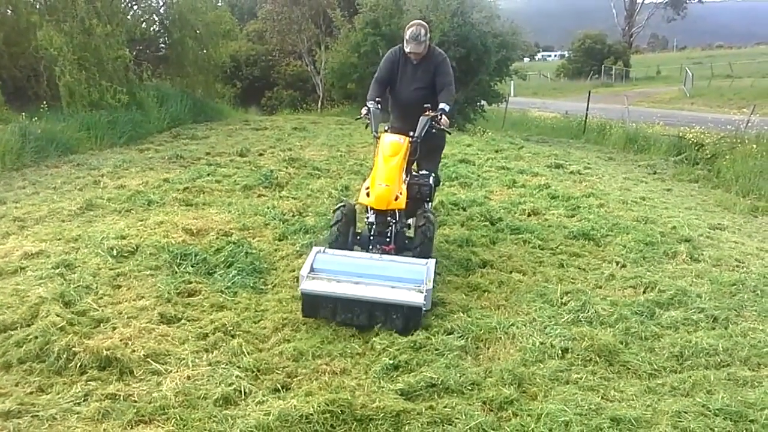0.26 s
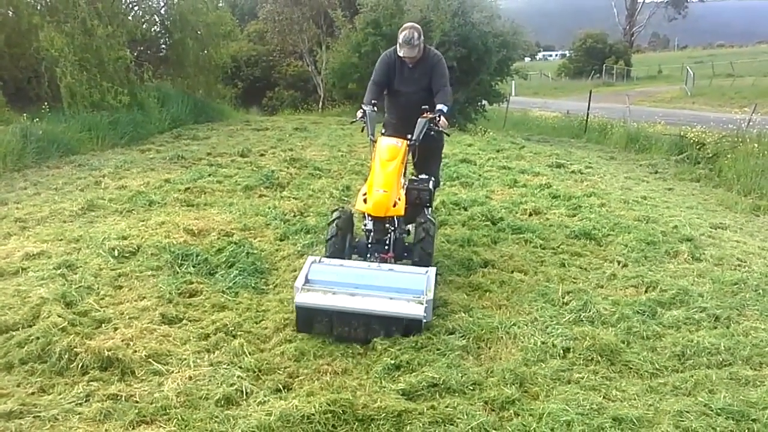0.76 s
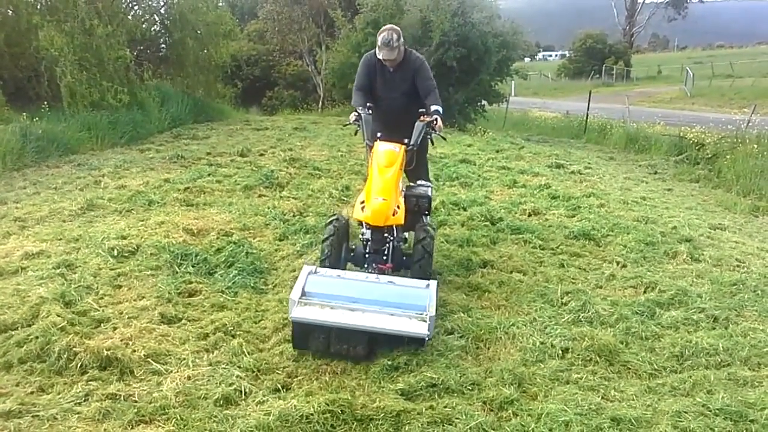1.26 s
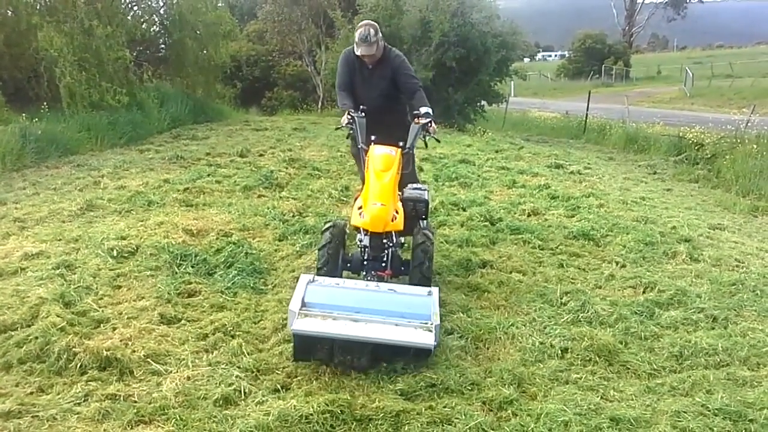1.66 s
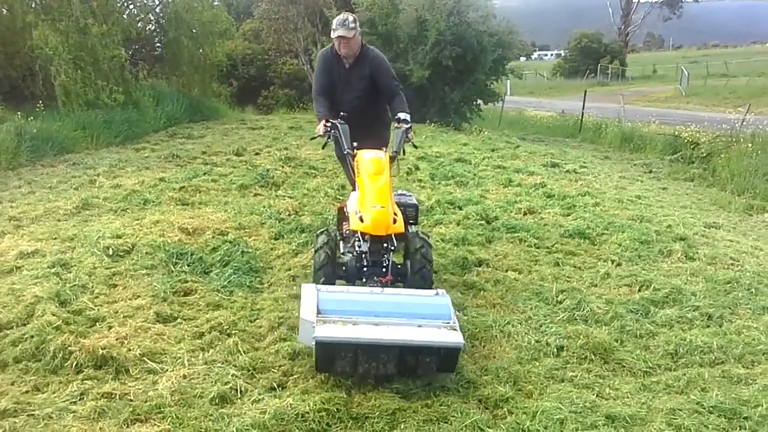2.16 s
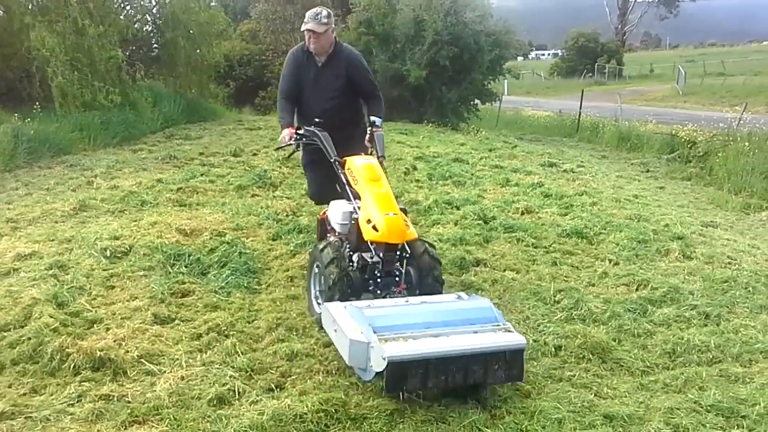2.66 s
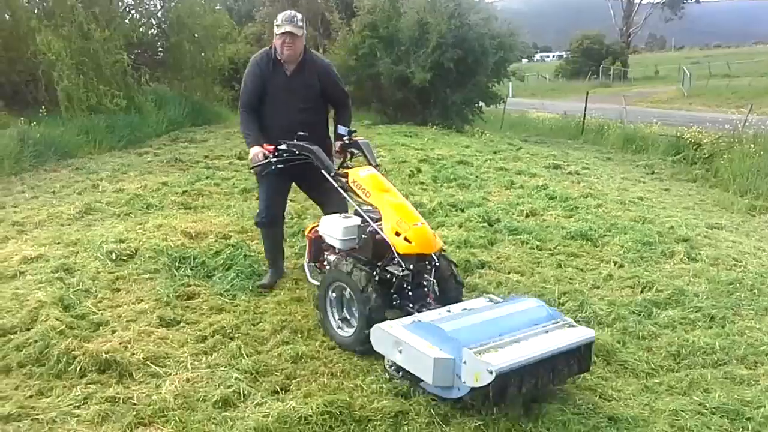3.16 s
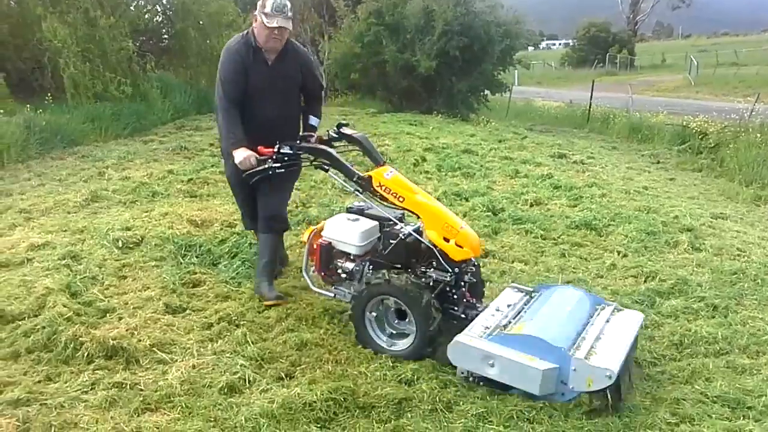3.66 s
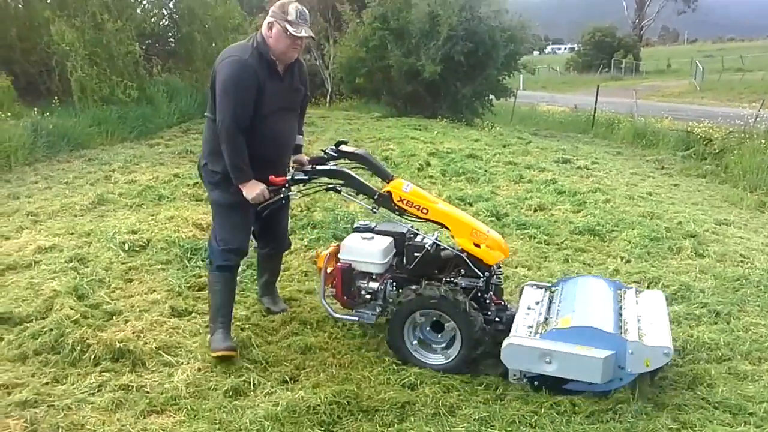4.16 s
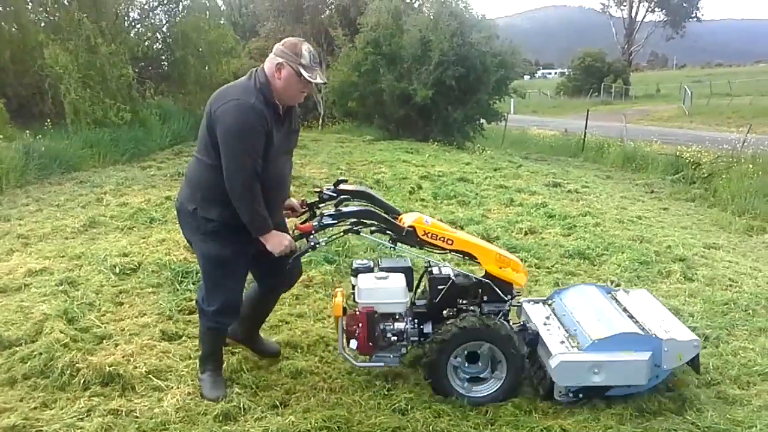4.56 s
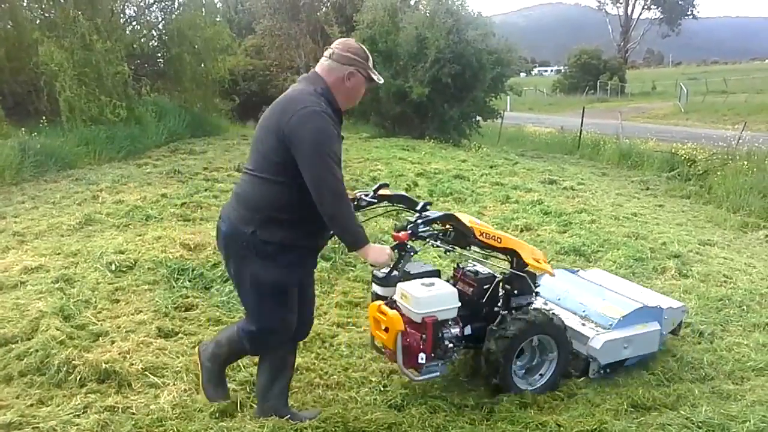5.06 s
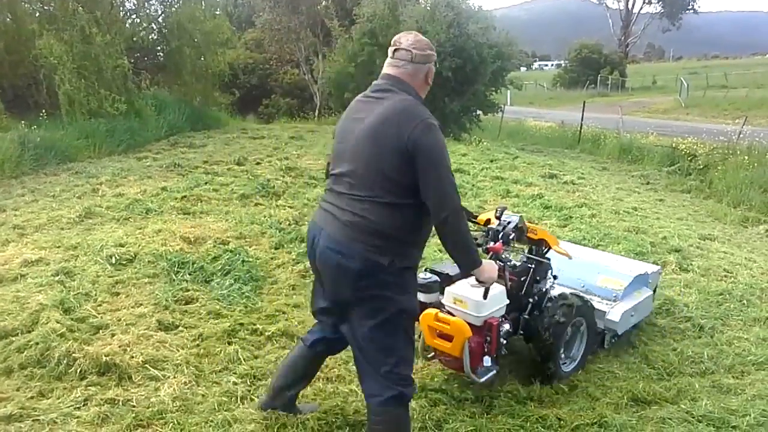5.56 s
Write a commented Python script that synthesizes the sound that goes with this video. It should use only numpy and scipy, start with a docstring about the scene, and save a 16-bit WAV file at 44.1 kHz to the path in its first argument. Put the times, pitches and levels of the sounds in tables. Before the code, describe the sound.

A single-cylinder walking tractor drives a flail mower over long grass, loud and continuous from start to end, in open air with one fairly close microphone. Exhaust beats come about 28 a second, fused into a rough, throbbing buzz, over a droning rotor and the wide rushing noise of flails, grass and fan. At 0.2 s the level dips briefly and returns. From 1.3 s the engine labours, its pitch sagging slightly to about 2 s, then recovering by 2.9 s. Around 2.4-2.9 s a thin airy whistle stands out near 2.9 kHz. At 3.0-3.6 s loose casing rattles while a hollow ringing slides downward. Gear whine swells near 4 s and most strongly at 5.1-5.5 s, around 1.2 kHz. From 5 s the exhaust is brighter and harder, with more metallic panel ringing. Low wind puffs touch the microphone near 4.3 and 5.6 s. The sound stops still running.

```python
"""Quick exhaust beats over a droning rotor, with a brief dip in level at the start: a single-cylinder
walking tractor drives a flail mower over long grass and turns round. The beats and the drone are sums of
tones locked to the engine; the gear whine is too. Panels, hollows and loose sheet metal are narrow bands
of noise; flails, cut grass and fan are wide noise. All change colour in the turn; the engine sags briefly
under load and puffs of wind touch the microphone."""
import sys
import numpy as np
from scipy import signal
from scipy.io import wavfile
from scipy.ndimage import uniform_filter1d

SR = 44100
rng = np.random.default_rng(int(sys.argv[2]) if len(sys.argv) > 2 else 0)


def store_wav(level_fs):
    """Save 16-bit WAV to argv[1]."""
    pcm = np.round(np.clip(np.atleast_2d(level_fs), -1, 1) * 32767)
    wavfile.write(sys.argv[1], SR, pcm.T.astype(np.int16))


N = 256220  # length in samples
ROTOR_TURNS_PER_FIRING = 1.5878  # the gearing between engine and rotor


def gain_of(db):
    """Turns decibels into a factor on the wave."""
    return 10 ** (np.asarray(db) / 20)


def evened(x):
    """Scales a signal to rms 1."""
    return x / np.sqrt(np.mean(x ** 2) + 1e-20)


def curve(rows, column=1):
    """One column of a table, joined by straight lines, at every sample."""
    rows = np.array(rows)
    return np.interp(np.arange(N) / SR, rows[:, 0], rows[:, column])


def by_stage(values, stage):
    """Blends the four values of a row along the stage curve; past stage 3 the last value holds."""
    return np.interp(stage, np.arange(4), values)


def bump(t, middle, length, power):
    """Rises softly to 1 at the middle and falls again; a higher power gives a flatter top."""
    return np.exp(-abs(2 * (t - middle) / length) ** power)


def wander(hz):
    """Slow chance of rms about 1, moving at rates up to about hz."""
    steps = rng.standard_normal(N // 64 + 3000)
    lowpass = signal.butter(2, hz, fs=SR / 64, output="sos")
    # the first steps are dropped, while the filter settles
    smooth = signal.sosfilt(lowpass, steps)[-(N // 64 + 2):]
    return np.interp(np.arange(N) / 64, np.arange(len(smooth)), evened(smooth))


def swells(rows, usual_db):
    """Gain of a sound that rises above its usual level for a while; the powers add up."""
    t = np.arange(N) / SR
    power = gain_of(2 * usual_db)
    power = power + sum(gain_of(2 * db) * bump(t, middle, length, 3) for middle, length, db in rows)
    return np.sqrt(power)


def tones(rows, turns, stage, lags, waver_db, changes=()):
    """Whole multiples of a turning shaft, each wavering a little in level."""
    t, out = np.arange(N) / SR, 0
    for (multiple, *db), lag in zip(rows, lags):
        change_db = sum(rise_db * bump(t, middle, length, 3)
                        for order, middle, length, rise_db in changes if order == multiple)
        level_db = by_stage(db, stage) + change_db + waver_db * wander(2.5)
        wave = np.cos(2 * np.pi * multiple * turns + lag)
        out = out + np.sqrt(2) * gain_of(level_db) * wave
    return out


def hollow(rows, width_hz):
    """Noise smoothed to the width and lifted to a moving tone, like air ringing in a hollow."""
    base = rng.standard_normal(N) + 1j * rng.standard_normal(N)
    band = signal.sosfilt(signal.butter(2, width_hz / 2, fs=SR, output="sos"), base)
    tone = np.exp(2j * np.pi * np.cumsum(curve(rows, column=1)) / SR)
    level_db = curve(rows, column=2) + 0.6 * wander(4.1)
    return gain_of(level_db) * evened((band * tone).real)


# engine speed, which sags for a moment under load: (t/s, firings a second)
ENGINE_SPEED = [(0.0, 28.634), (0.45, 28.882), (0.9, 28.388), (1.35, 28.181), (1.7, 27.654), (1.95, 26.965),
                (2.05, 27.129), (2.4, 28.097), (2.85, 29.097), (3.2, 29.003), (3.6, 28.995), (3.95, 28.663),
                (4.4, 28.437), (5.0, 28.429), (5.81, 28.36)]


def crank():
    """Engine cycles counted along the sound; each whole number is a firing, close to its exhaust blow."""
    return np.cumsum(curve(ENGINE_SPEED)) / SR - .66


def knock(cycles):
    """Each firing jolts the frame, so what it carries is a little louder just after."""
    return 1 + 0.12 * np.cos(2 * np.pi * (cycles - .08))


# puffs of wind: (middle t/s, length/s, level/dB rms)
WIND_PUFFS = [(2.35, 0.18, -43), (2.65, 0.4, -47), (4.27, 0.26, -36.5), (5.65, 0.63, -37.5)]
BREEZE_DB = -57  # level between the puffs


def wind():
    """Moving air presses on the microphone as a lumpy low rumble."""
    low_band = signal.butter(2, [55, 125], "band", fs=SR, output="sos")
    rumble = evened(signal.sosfilt(low_band, rng.standard_normal(N)))
    return swells(WIND_PUFFS, BREEZE_DB) * gain_of(2.8 * wander(19)) * rumble


# rumble under the exhaust tones: (f/Hz, then level/dB per Hz at stages 0, 1, 2, 3)
LOW_RUMBLE = [(40, -80, -80, -80, -80), (95, -73, -73, -73, -72), (130, -62, -60, -60, -61),
              (260, -51.5, -51, -51, -52), (400, -51.5, -51.5, -50, -50.5), (500, -57, -56.5, -55.5, -54),
              (570, -63, -61, -59, -59)]
# flails, cut grass and cooling fan: (f/Hz, then level/dB per Hz at stages 0, 1, 2, 3)
FLAIL_ROAR = [(724, -45.5, -48.5, -56.5, -56.5), (880, -66.5, -67.5, -59, -51),
              (1002, -49.5, -51.5, -51, -53.5), (1800, -63.5, -64, -58.5, -55.5),
              (2140, -62, -58.5, -55, -53), (3090, -64.5, -63.5, -61.5, -68),
              (3260, -75.5, -74, -70.5, -67.5), (6150, -81.5, -80.5, -79, -77.5),
              (7450, -91, -91.5, -92, -88), (7830, -75, -74, -75, -70)]
# bands where the roar thins out in the turn: (middle t/s, length/s, f/Hz, width/Hz, change/dB)
THIN_BANDS = [(3.2, 1.0, 650, 90, -6.5), (4.55, 0.71, 700, 160, -7), (5.4, 0.56, 730, 130, -2),
              (4.0, 0.79, 920, 110, -5.5), (2.5, .8, 580, 120, -5), (4.05, .5, 4150, 350, -6),
              (5.55, .4, 4250, 350, -5), (5.1, .8, 3380, 250, -4), (2.35, .5, 1900, 200, -3.5)]


def roar(cycles, stage):
    """Flails, grass and fan make drifting noise; above 800 Hz clatter repeats every engine cycle."""
    grain = rng.standard_normal(1550)
    clatter = grain[(cycles % 1 * len(grain)).astype(int)]
    hz, t, noise = signal.stft(rng.standard_normal(N), SR, nperseg=1024, noverlap=768)
    repeat = signal.stft(clatter, SR, nperseg=1024, noverlap=768)[2]
    fine, wide = rng.standard_normal((2, *noise.shape))
    patches = evened(uniform_filter1d(uniform_filter1d(wide, 6, 0), 40, 1))
    # single tones of the clatter stand out for a while
    lines = evened(uniform_filter1d(fine, 40, 1))
    share = 0.41 * (hz > 800)[:, None] * gain_of(5.9 * lines)

    # tone colour of each short frame, from the stage at that moment
    table = np.array(LOW_RUMBLE + FLAIL_ROAR)
    frame_stage = stage[np.minimum(t * SR, N - 1).astype(int)]
    per_frame = np.array([by_stage(row[1:], frame_stage) for row in table]).T
    log_hz = np.log(table[:, 0])
    colour_db = np.array([np.interp(np.log(hz + 1), log_hz, db) for db in per_frame]).T
    for middle, length, band_hz, width_hz, change_db in THIN_BANDS:
        in_band = bump(hz[:, None], band_hz, width_hz, 2)
        colour_db = colour_db + change_db * in_band * bump(t, middle, length, 4)

    frames = (noise + share * repeat) * gain_of(colour_db + 1.2 * patches) * np.sqrt(SR / 2)
    puff = 1 + 0.035 * np.cos(2 * np.pi * (cycles - .05))  # a slight pulse at each firing
    return puff * signal.istft(frames, SR, nperseg=1024, noverlap=768)[1][:N]


# panels shaken by the drive: (f/Hz, width/Hz, then level/dB rms at stages 0, 1, 2, 3)
SHAKEN_PANELS = [(1226, 213, -30.5, -31.5, -25, -23.5), (1586, 51, -41, -42, -48, -30.5),
                 (1899, 200, -42, -39.5, -34, -40.5), (2459, 210, -42.5, -43, -31, -27.5),
                 (3820, 200, -49.5, -48.5, -52.5, -47), (6150, 190, -59.5, -52.5, -52, -60)]


def panels(stage):
    """Shaken sheet panels ring as noise in narrow bands that come and go."""
    out = 0
    for hz, width_hz, *db in SHAKEN_PANELS:
        edges = [hz - width_hz / 2, hz + width_hz / 2]
        band = signal.butter(1, edges, "band", fs=SR, output="sos")
        twice = np.r_[band, band]  # filtering twice steepens the sides
        ring = signal.sosfilt(twice, rng.standard_normal(N))
        out = out + gain_of(by_stage(db, stage) + 2.0 * wander(2.7)) * evened(ring)
    return out


# narrow whistle at the lip of the hood: (t/s, f/Hz, level/dB rms)
LIP_WHISTLE = [(0, 2851, -49), (2.3, 2860, -47), (2.45, 2860, -31), (2.62, 2865, -30), (2.88, 2884, -31.5),
               (3.0, 2880, -47.5), (5.81, 2885, -54)]
# hollows whose tone and strength shift with the angle to the listener: (t/s, f/Hz, level/dB rms)
HOOD_HOLLOW = [(0, 2834, -35.5), (2.2, 2849, -35), (2.5, 2803, -28.5), (2.85, 2760, -28), (3.0, 2558, -37),
               (3.15, 2426, -31), (3.3, 2310, -32.5), (3.45, 2200, -29), (3.6, 2150, -43), (3.8, 2140, -47),
               (4.85, 2220, -42), (5.1, 2240, -30.5), (5.3, 2230, -31.5), (5.5, 2200, -41),
               (5.81, 2210, -36)]
COWL_HOLLOW = [(0, 4030, -50.5), (1.3, 4250, -53), (1.8, 4320, -47), (2.6, 4214, -50), (3.2, 4130, -52),
               (3.55, 4445, -41.5), (4.15, 4480, -42.5), (4.45, 4550, -46.5), (5.81, 4440, -53.5)]
CHUTE_HOLLOW = [(0, 747, -32), (2, 725.2, -28.5), (3.8, 743.3, -29), (4.2, 740.3, -37), (4.9, 748.5, -44.5),
                (5.3, 758.6, -35), (5.81, 762, -26)]
LIP_WIDTH_HZ, HOOD_WIDTH_HZ, COWL_WIDTH_HZ, CHUTE_WIDTH_HZ = 31, 160, 150, 114


def hollows(cycles):
    """Hollow parts of the machine ring at moving tones; each firing also jolts the chute."""
    whistle = hollow(LIP_WHISTLE, LIP_WIDTH_HZ)
    hood = hollow(HOOD_HOLLOW, HOOD_WIDTH_HZ)
    cowl = hollow(COWL_HOLLOW, COWL_WIDTH_HZ)
    chute = knock(cycles) * hollow(CHUTE_HOLLOW, CHUTE_WIDTH_HZ)
    return whistle + hood + cowl + chute


# loose sheet metal, a low and a high part: (t/s, f/Hz, level/dB rms before its flutter)
LOOSE_CASING = [(0, 948, -53.5), (2.9, 950, -46), (3.05, 950, -32), (3.55, 973, -32.5), (3.7, 995, -48.5),
                (5.81, 957, -52.5)]
LOOSE_RATTLE = [(0, 3680, -53), (3.6, 3650, -54.5), (3.8, 3662, -43.5), (4.3, 3685, -45),
                (4.9, 3708, -43.5), (5.1, 3770, -44.5), (5.81, 3830, -46.5)]
CASING_WIDTH_HZ, RATTLE_WIDTH_HZ, RATTLE_FLUTTER_DB = 80, 280, 3


def rattle():
    """Loose sheet metal rattles in bursts: narrow noise with a quick flutter in level."""
    casing = gain_of(RATTLE_FLUTTER_DB * wander(13)) * hollow(LOOSE_CASING, CASING_WIDTH_HZ)
    high = gain_of(RATTLE_FLUTTER_DB * wander(13)) * hollow(LOOSE_RATTLE, RATTLE_WIDTH_HZ)
    return casing + high


# meshing gear teeth, one entry a tone: (multiple of the firing rate)
MESH_MULTIPLES = [34, 27 * ROTOR_TURNS_PER_FIRING, 48, 58, 88, 66, 110, 33] + [9 * k * ROTOR_TURNS_PER_FIRING for k in (5, 6, 7, 9, 10, 11)]
# usual strength of each mesh tone: (level/dB rms)
MESH_DB = [-38.5, -37.5, -46, -53.5, -45, -46.5, -47, -50.5, -44.5, -44.5, -43, -56, -58, -59.5]
# each tone swells when its housing faces the listener, one list a tone: (middle t/s, length/s, level/dB rms)
MESH_SWELLS = [
    [(3.08, 0.13, -24.5), (3.38, 0.3, -27), (3.9, 0.26, -32), (5.25, 0.8, -31.5)],
    [(0.85, 1.7, -30), (2.4, 0.1, -25.5), (2.95, 0.42, -26), (3.97, 0.4, -19.5), (4.33, 0.39, -19),
     (5.12, 0.27, -19), (5.43, 0.33, -15.5), (5.66, 0.21, -24.5)],
    [(3.15, 0.86, -35.5), (4.75, 0.49, -39)],
    [(4.6, 1, -30), (5.3, 0.26, -29.5)],
    [(1.95, 0.45, -30.5), (3.0, 0.71, -32), (4.3, 0.86, -30.5), (5.2, 0.63, -36.5)],
    [(1.7, 1.3, -36), (2.85, 0.21, -31), (3.2, 0.22, -31), (3.9, 0.96, -33.5), (4.8, 0.27, -35)],
    [(2.6, 0.54, -42.5), (4.6, 0.48, -51)],
    [(0.4, .6, -39), (3.4, 0.61, -31), (5.3, 0.86, -35)],
    [(2.6, 0.47, -37), (3.25, 0.55, -32)],
    [(1.0, 1.7, -36.5), (3.65, 0.26, -29.5), (4.15, 0.65, -28), (5.4, 0.34, -35)],
    [(0.5, 0.71, -41.5), (2.6, 0.52, -41)],
    [(0.6, 0.8, -55), (3.85, 0.2, -48), (4.3, 0.11, -39.5), (4.48, 0.12, -41), (4.68, 0.078, -42),
     (4.9, 0.29, -42.5)],
    [(0.4, 0.32, -49.5), (1.7, 0.77, -49.5), (3.3, 0.82, -46.5), (4.5, 0.22, -47), (5.0, 0.3, -45)],
    [(3.0, 0.91, -54), (3.9, 0.73, -42.5), (5.7, 0.23, -47)],
]
# quick waver of each mesh tone: (change/dB)
MESH_FLUTTER_DB = [2.5, 1.5, 4, 5, 3, 3, 4, 3, 4, 3, 4, 5, 4, 4]
MESH_WAVER_DB, MESH_THROB = 0.7, 0.2  # slow waver; share of the throb


def gears(cycles):
    """Meshing teeth whine; the uneven push of one cylinder throbs them once a cycle."""
    throb = 1 + MESH_THROB * np.cos(2 * np.pi * (cycles - .1))
    cycles = cycles + .0026 * wander(10)  # the turning is slightly uneven
    out = 0
    for teeth, rows, usual_db, flutter_db in zip(MESH_MULTIPLES, MESH_SWELLS, MESH_DB, MESH_FLUTTER_DB):
        waver_db = MESH_WAVER_DB * wander(2.4) + flutter_db * np.tanh(wander(11))
        gain = swells(rows, usual_db) * gain_of(waver_db)
        out = out + np.sqrt(2) * gain * np.cos(2 * np.pi * teeth * cycles)
    return throb * out


# drone of the rotor: (multiple of the rotor speed, then level/dB rms at stages 0, 1, 2, 3)
ROTOR_TONES = [(3, -45, -44, -48, -47), (4, -27, -31, -31, -29), (6, -29, -34, -38, -43),
               (7, -38, -37, -33, -38), (8, -24, -22, -27, -34), (9, -28, -28, -28, -40)]
# rotor tones that swell or fade for a while: (multiple of the rotor speed, middle t/s, length/s, change/dB)
ROTOR_CHANGES = [(8, 3.2, .6, 2.5), (8, 3.4, 0.39, -8), (8, 4.6, .3, 6.5), (9, 4.15, .5, 6),
                 (9, 8.5, .5, 1), (7, 3.8, .3, -8), (6, 1.5, .5, 7)]


def rotor(cycles, stage):
    """Rows of flails beat the air under the hood, geared to the engine."""
    turns = ROTOR_TURNS_PER_FIRING * cycles
    lags = 2 * np.pi * rng.random(len(ROTOR_TONES))
    return tones(ROTOR_TONES, turns, stage, lags, waver_db=2.06, changes=ROTOR_CHANGES)


# exhaust tones: (multiple of the firing rate, then level/dB rms at stages 0, 1, 2, 3)
EXHAUST_TONES = [(2, -41, -39.5, -43.5, -42), (3, -42.5, -43.5, -42, -46.5), (4, -33.5, -40, -42.5, -36.5),
                 (5, -27.5, -25.5, -26.5, -26), (6, -26, -28, -28.5, -31.5), (7, -33, -34, -27.5, -36.5),
                 (8, -25.5, -24, -21.5, -27), (9, -35.5, -33.5, -24, -23), (10, -28, -27, -33.5, -31.5),
                 (11, -30, -33.5, -31, -27.5), (12, -33.5, -31, -26.5, -30), (13, -40, -32, -36, -35.5),
                 (14, -26.5, -31, -24, -23.5), (15, -35.5, -29.5, -31.5, -25),
                 (16, -29.5, -26.5, -25.5, -25), (17, -28, -22, -32, -27), (18, -34, -27.5, -41, -23),
                 (19, -44.5, -33, -51.5, -36.5), (20, -56.5, -40.5, -44, -36), (21, -43, -48.5, -49, -60.5),
                 (22, -35.5, -42.5, -35.5, -36.5), (23, -42, -41.5, -55, -48),
                 (24, -39.5, -40, -36.5, -57.5), (25, -37.5, -40, -46.5, -56),
                 (26, -36.5, -39.5, -45.5, -44), (27, -49.5, -32.5, -42.5, -57),
                 (28, -39.5, -37.5, -45.5, -41)]
# exhaust tones that swell or fade in the turn: (multiple of the firing rate, middle t/s, length/s, change/dB)
EXHAUST_CHANGES = [(7, 2.3, 0.66, -17), (8, 2.19, 0.53, 4.5), (8, 4.04, 1.2, 3.5), (8, 5.05, 0.75, -7.5),
                   (9, 5.72, 0.68, 7), (11, 2.8, 1.1, 1.5), (11, 4.21, 0.62, 6.5), (11, 5.26, 0.39, -13.5),
                   (12, 2.6, 0.61, -11.5), (13, 3.1, 0.69, 6), (14, 3.2, 0.35, -1.5), (17, 1.5, 0.25, 0.5),
                   (17, 2.61, 0.66, -2.5), (18, 1.78, 0.31, 6), (19, 2.0, .5, 4), (20, 2.45, 0.6, 3),
                   (21, 2.6, .7, 11), (22, 4.5, .3, -5.5), (22, 5.5, .7, -7), (22, 2.85, .4, 10),
                   (25, 2.9, 0.89, 8), (8, 1.54, 0.33, -5.5), (8, 0.54, 0.89, 1.5), (9, 1.5, 0.52, 3.5),
                   (15, 1.83, .3, 4), (16, 4.15, 0.36, -3.5), (17, 3.5, .6, 5.5), (17, 5.35, 0.65, 4),
                   (18, 3.85, 0.81, 8.5), (19, 4.2, 0.45, 12.5), (19, 4.9, .3, 4), (24, 2.7, .5, 6),
                   (14, 5, .5, -4)]
BLOW_DELAY, GULP_LEAD = 0.007, 0.31  # engine cycles
PIPE_ORDER, PIPE_SHARPNESS = 17.7, 8  # pipe resonance: multiple of the firing rate, Q
OUTLET_LEAD = 0.009  # cycles a stage by which the sharp blow comes earlier as the outlet swings nearer
SHADE_S, SHADE_LENGTH_S, SHADE_DB = 4.12, 0.5, -4  # the sharp blow fades for a moment in mid turn


def exhaust(cycles, stage):
    """Each firing blows through the pipe: one pulse a cycle, built as a sum of tones."""
    orders = np.arange(len(EXHAUST_TONES)) + 2
    near = orders / PIPE_ORDER
    ringing = np.arctan2(near / PIPE_SHARPNESS, 1 - near ** 2)  # the blow rings the pipe
    lags = -2 * np.pi * BLOW_DELAY * orders - ringing
    # an echo from the ground, a ninth of a cycle late, spreads the blow
    lags = lags - .65 * np.sin(2 * np.pi * .109 * orders)
    # the lowest tones are an inward gulp of the intake, a third of a cycle before the blow
    lags = np.where(orders < 7, np.pi + 2 * np.pi * GULP_LEAD * orders, lags)

    cycles = cycles + .002 * wander(8)  # no two firings come quite on time
    shade = gain_of(SHADE_DB * bump(np.arange(N) / SR, SHADE_S, SHADE_LENGTH_S, 4))
    low = tones(EXHAUST_TONES[:10], cycles, stage, lags[:10], waver_db=0.7, changes=EXHAUST_CHANGES)
    sharp = tones(EXHAUST_TONES[10:], cycles + OUTLET_LEAD * stage, stage, lags[10:],
                  waver_db=1.38, changes=EXHAUST_CHANGES)
    sharp = shade * gain_of(.7 * wander(10)) * sharp
    return gain_of(.7 * wander(14)) * (low + sharp)


# the turn: (t/s, stage: 0 mower in front, 1 labouring in thick grass, 2 side on, 3 and up exhaust in front)
TURN_STAGE = [(0, 0), (1.3, 0.62), (1.8, 1.15), (2.35, 0.87), (2.9, 1.64), (3.6, 2.0), (4.5, 2.5),
              (4.85, 2.5), (5.0, 5), (5.81, 5)]
# loudness on top of the stage, with a brief dip at the start: (t/s, level/dB)
MACHINE_LEVEL = [(0, 1.5), (0.2, -3.5), (0.4, 0.5), (0.6, -1), (1.9, 0.5), (2.6, 0), (3.0, 1.2),
                 (3.6, -0.2), (4.6, 0), (5.1, -0.5), (5.6, -2), (5.81, -2)]
ENGINE_SHARE = 0.7  # exhaust and rotor follow this share of the level in dB
ENGINE_DRIFT_DB, ROAR_DRIFT_DB = 0.4, 0.3


def scene():
    """All parts of the machine add up in the open air, with the wind."""
    cycles, stage, level_db = crank(), curve(TURN_STAGE), curve(MACHINE_LEVEL)
    engine_gain = gain_of(ENGINE_SHARE * level_db + ENGINE_DRIFT_DB * wander(0.68))
    engine = engine_gain * (exhaust(cycles, stage) + rotor(cycles, stage))
    noise_gain = gain_of(level_db + ROAR_DRIFT_DB * wander(0.92))
    ringing = knock(cycles) * panels(stage) + hollows(cycles) + rattle()
    noise = noise_gain * (ringing + roar(cycles, stage))
    return (wind() + noise + gears(cycles) + engine)[None]


LOW_CUT_HZ, TOP_EDGE_HZ = 67, 7671


def record(dry):
    """The microphone drops the deepest bass and the highest peaks clip; then the treble is cut off."""
    low_cut = signal.butter(2, LOW_CUT_HZ, "high", fs=SR, output="sos")
    clipped = np.clip(signal.sosfilt(low_cut, dry), -1, 1)
    taps = signal.firwin(511, TOP_EDGE_HZ, window=("kaiser", 9), fs=SR)
    return np.clip(signal.oaconvolve(clipped, taps[None], "same"), -1, 1)


dry = scene()
out = record(dry)
store_wav(out)
```